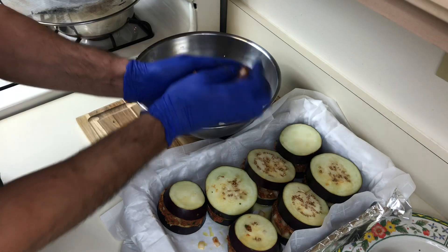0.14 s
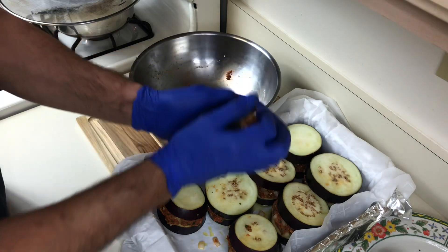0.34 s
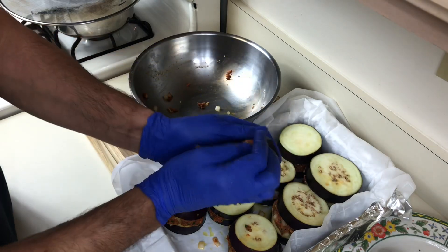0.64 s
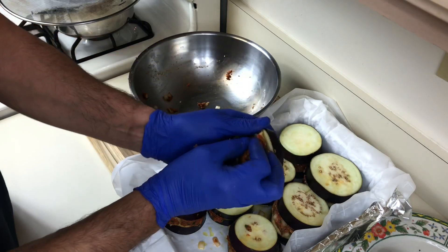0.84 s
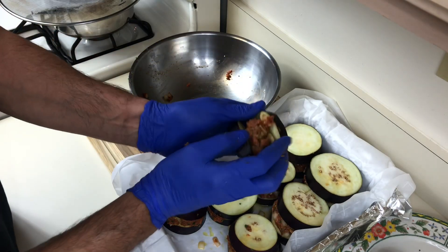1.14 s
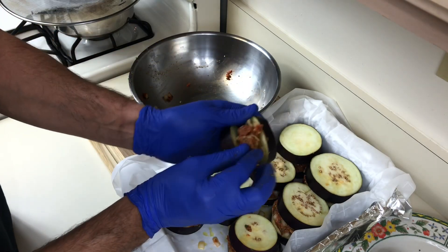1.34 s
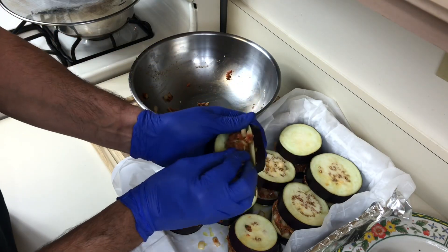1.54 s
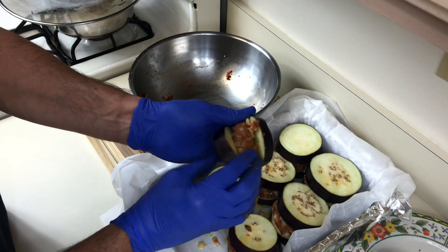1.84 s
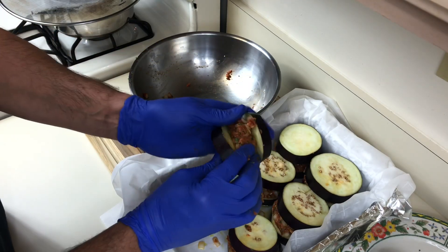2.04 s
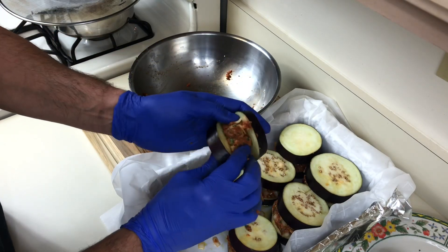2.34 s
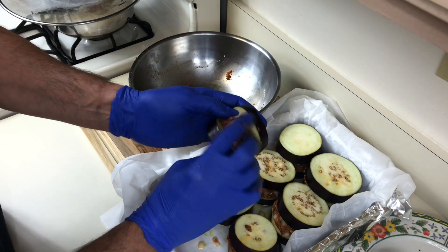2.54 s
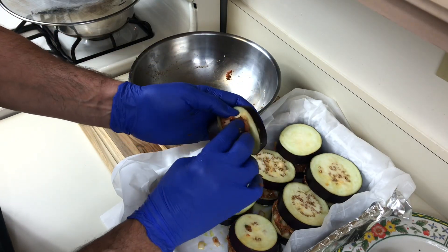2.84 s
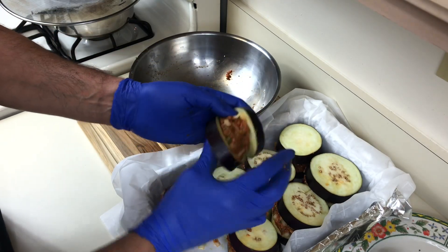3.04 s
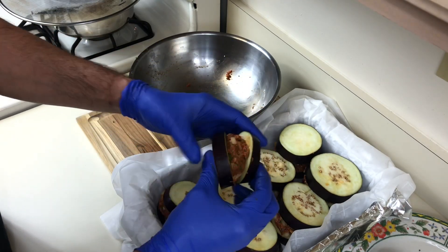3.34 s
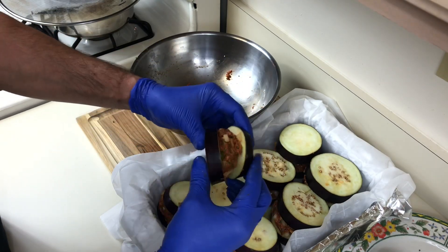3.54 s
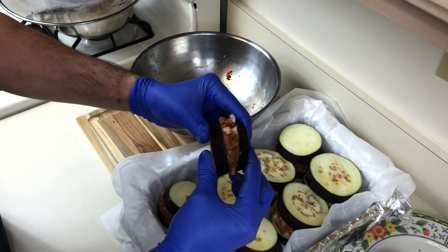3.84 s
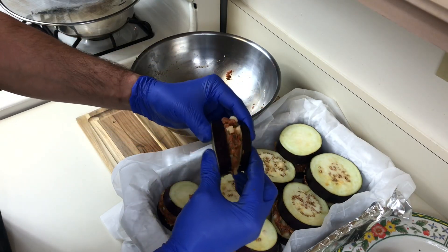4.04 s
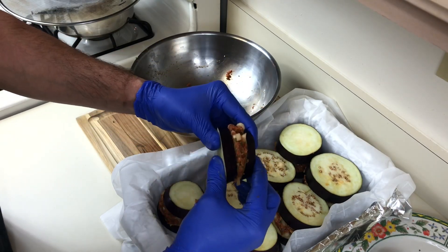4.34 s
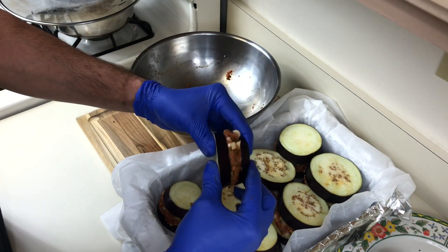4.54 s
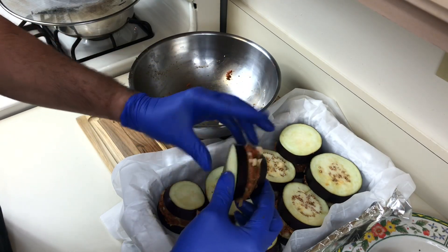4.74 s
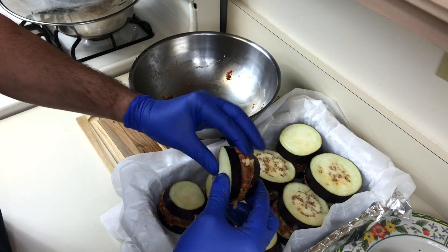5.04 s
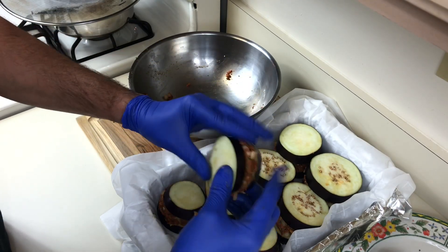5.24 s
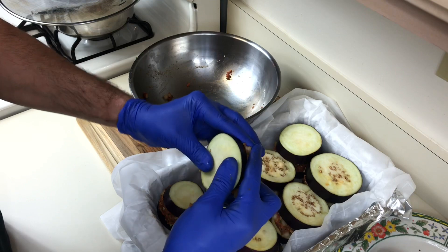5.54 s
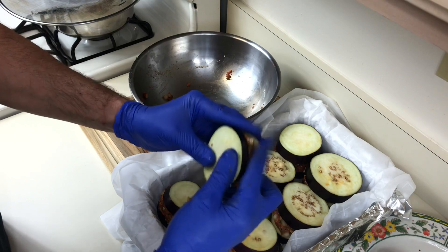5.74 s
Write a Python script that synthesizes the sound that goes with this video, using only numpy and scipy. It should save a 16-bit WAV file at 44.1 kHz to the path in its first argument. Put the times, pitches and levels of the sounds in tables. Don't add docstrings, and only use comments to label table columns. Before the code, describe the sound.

Close-miked rubber gloves handle stuffed eggplant in a small hard-walled kitchen. Fine rubbing, rustles and tiny wet ticks run over soft hiss and a wavering low hum. A soft smack comes early, a loud one at 1.5 seconds, then quieter pressing before two sharp slaps near five seconds.

```python
import sys
import numpy as np
from scipy import signal
from scipy.fft import rfft, irfft, next_fast_len
from scipy.io import wavfile

SR = 44100
rng = np.random.default_rng(int(sys.argv[2]) if len(sys.argv) > 2 else 0)


def decibels_to_gain(level_db):
    exponent = np.asarray(level_db, float) / 20
    return 10 ** exponent


def unload_audio(sound):
    columns = np.transpose(np.atleast_2d(sound))
    steps = np.round(np.clip(columns, -1, 1) * 32767)
    wavfile.write(sys.argv[1], SR, steps.astype(np.int16))


N = 260073


def rms_one(x):
    return x / np.sqrt(np.mean(x ** 2) + 1e-20)


def level_curve(rows, silent_db=-120):
    s, db = np.transpose(rows)
    return np.interp(np.arange(N) / SR, s, db, silent_db, silent_db)


def at_hz(points, hz):
    point_hz, value = np.transpose(points)
    return np.interp(np.log(hz + 1), np.log(point_hz), value)


def colour(x, points):
    size = next_fast_len(len(x) + 8192)
    gain = decibels_to_gain(at_hz(points, np.fft.rfftfreq(size, 1 / SR)))
    cepstrum = irfft(np.log(gain), size)
    cepstrum[1:size // 2] *= 2
    cepstrum[size // 2 + 1:] = 0
    return irfft(rfft(x, size) * np.exp(rfft(cepstrum)), size)[:len(x)]


def resonate(x, hz, width_hz):
    r = np.exp(-np.pi * width_hz / SR)
    poles = [1, -2 * r * np.cos(2 * np.pi * hz / SR), r * r]
    return signal.lfilter([(1 - r * r) / 2, 0, (r * r - 1) / 2], poles, x)


def drift(rate):
    steps = rng.standard_normal(4000)
    return np.interp(np.arange(N) / SR * rate, np.arange(len(steps)), steps) * np.sqrt(1.5)


def patchy(x, patchy_db, rate):
    bins, hz, out = rfft(x), np.fft.rfftfreq(len(x), 1 / SR), 0
    band = np.clip(2 * np.log2(hz / 150 + 1e-9), -1, 13)
    for k in range(-1, 14):
        share = np.maximum(1 - np.abs(band - k), 0)
        out = out + decibels_to_gain(patchy_db * drift(rate)) * irfft(bins * share, len(x))[-N:]
    return out


def grains(size, per_s, spread_db):
    strength = decibels_to_gain(spread_db * np.minimum(rng.exponential(1, size), 4))
    sign = rng.choice([-1, 1], size)
    return strength * sign * (rng.random(size) < per_s / SR)


def add(out, s, x):
    i = int(s * SR)
    out[max(i, 0):i + len(x)] += x[max(-i, 0):N - i]


# f/Hz, t60/s
KITCHEN_T60 = [(200, 0.47), (530, 0.36), (1400, 0.3), (3700, 0.23), (9700, 0.24), (15000, 0.085)]
# last until t/s, level over the diffuse sound/dB
EARLY_ECHOES = (0.011, 4.7)


def kitchen(x, onset_s=0.0016):
    t, echoes = np.arange(SR // 2) / SR, 0
    for hz in 180 * 2. ** np.arange(7):
        edges = [hz / np.sqrt(2), min(hz * np.sqrt(2), 18000)]
        sos = signal.butter(2, edges, "band", fs=SR, output="sos")
        noise = signal.sosfilt(sos, rng.standard_normal(len(t)))
        echoes = echoes + noise * decibels_to_gain(-60 * t / at_hz(KITCHEN_T60, hz))
    until_s, early_db = EARLY_ECHOES
    early = decibels_to_gain(early_db * np.clip((until_s - t) / 0.0027 + 1, 0, 1))
    echoes = echoes * np.clip(t / onset_s - 1, 0, 1) * early
    return signal.fftconvolve(x, echoes / np.sqrt(np.sum(echoes ** 2)))[:N]


# f/Hz, level per Hz/dB
HISS = [(15, -56.5), (25, -8.5), (55, 0.5), (102, 1), (127, -6), (161, -9.5), (229, -6), (416, -16.5),
        (1440, -18), (2300, -23), (3820, -29), (7710, -32), (8590, -31), (10400, -34), (11900, -30),
        (16000, -37)]


def room_hiss():
    white = rng.standard_normal(next_fast_len(N + SR))
    return decibels_to_gain(-60.5) * rms_one(patchy(colour(white, HISS), patchy_db=1.1, rate=16.))


HUM_HZ = [58, 118.4]
# t/s, level/dB
MOTOR = [(0.0, -71), (0.13, -84), (0.29, -62), (0.43, -85), (0.47, -63.5), (0.85, -76.5), (0.93, -68),
         (1.07, -81), (1.12, -73.5), (1.76, -65.5), (1.82, -77), (2.94, -63), (2.97, -71), (3.5, -59),
         (3.61, -79), (3.74, -64.5), (5.37, -71), (5.9, -66.5)]
# f/Hz, width/Hz, rms level/dB
CABINET = (220, 28, -73)


def appliance():
    waver_per_s = 8.3
    lower_db = -61 - 8 * np.abs(drift(waver_per_s))
    upper_db = level_curve(MOTOR) + 3.9 - 5 * np.abs(drift(waver_per_s))
    tones = 0
    for hz, db in zip(HUM_HZ, (lower_db, upper_db)):
        turns = np.cumsum(hz + 0.783 * drift(5.3)) / SR
        tones = tones + np.sqrt(2) * decibels_to_gain(db) * np.sin(2 * np.pi * turns)
    hz, width_hz, db = CABINET
    white = rng.standard_normal(next_fast_len(N + SR))
    drone = resonate(resonate(white, hz, width_hz), hz, width_hz)[-N:]
    return tones + decibels_to_gain(db) * rms_one(drone)


# start t/s, length/s, level/dB
CREAK = [
    (3.526, 0.213, -69),
    (3.701, 0.25, -66.5),
]
# f/Hz, width/Hz, level/dB
CREAK_MODES = [(490, 76, 9), (615, 19, 6.5), (640, 31, -15), (880, 39, -2.5), (1300, 160, -3)]


def creak():
    slips = grains(N, per_s=1500., spread_db=2.5)
    modes = sum(decibels_to_gain(db) * rms_one(resonate(slips, hz, width_hz)) for hz, width_hz, db in CREAK_MODES)
    lean, edge_s = 0, .03
    for s, length_s, db in CREAK:
        end_s = s + length_s
        lean = lean + decibels_to_gain(level_curve([(s, db), (end_s, db), (end_s + edge_s, db - 20)]))
    return lean * rms_one(modes)


# t/s, peak level/dB, f/Hz, t60/s
KNOCKS = [(1.253, -58, 810, 0.032), (1.674, -43, 1166, 0.032), (2.799, -57, 666, 0.05),
          (3.081, -53, 533, 0.041), (3.247, -48.5, 1160, 0.035), (3.264, -45, 1060, 0.039),
          (5.066, -43.5, 1480, 0.14), (1.632, -50, 1200, .09), (1.674, -51, 500, .04),
          (1.694, -55, 900, .04), (4.935, -52, 698, 0.092), (3.704, -57, 580, 0.056),
          (3.788, -53, 615, 0.062), (3.849, -53, 600, 0.05)]


def knocks():
    out, t = np.zeros(N), np.arange(8192) / SR
    for s, peak_db, hz, t60 in KNOCKS:
        ring = np.sin(2 * np.pi * hz * t)
        ring += 0.52 * np.sin(.92 * np.pi * hz * t)
        ring += 0.14 * np.sin(3.9 * np.pi * hz * t)
        wet = 0.64 * rms_one(resonate(rng.standard_normal(len(t)), hz, 460.0))
        push = 1 - np.exp(-t / 0.0036)
        add(out, s, decibels_to_gain(peak_db - 3.0 - 60 * t / t60) * (ring + wet) * push)
    return out


# t/s, rubbing level/dB
RUBBING = [(0.0, -66.5), (.4, -68.5), (.62, -63), (1.02, -66.5), (1.45, -70), (1.56, -55.5), (1.68, -66.5),
           (2.76, -78.5), (2.95, -68), (3.4, -73), (3.75, -83), (4.2, -81), (4.75, -74.5), (4.91, -63),
           (5.03, -80), (5.22, -63), (5.5, -81.5), (5.8, -67)]


def rubbing():
    s, db = np.transpose(RUBBING)
    work_db = np.interp(np.arange(N) / SR, s, db)
    bright_db = work_db.mean() + 0.55 * (work_db - work_db.mean()) - 6.5 + 2.0 * drift(25.0)
    dull_db = work_db - 2.5
    fine = rms_one(grains(N, per_s=9000., spread_db=-1.5))
    stray = rms_one(grains(N, per_s=90., spread_db=4.))
    bright = colour(fine + 0.17 * stray, [(3000, -19), (6500, -2.0), (12000, -3.5), (16000, -9.0)])
    dull = colour(grains(N, per_s=7000., spread_db=5.5),
                  [(500, -11.5), (1500, -0.5), (4000, -1.0), (8000, -5.5)])
    bright = patchy(bright, patchy_db=3.5, rate=22.0)
    dull = patchy(dull, patchy_db=1.3, rate=18.)
    return decibels_to_gain(bright_db) * rms_one(bright) + decibels_to_gain(dull_db) * rms_one(dull)


# slip t/s, build-up/s, top level/dB
SQUEAKS = [
    (.62, .09, -71),
    (1.462, 0.066, -62),
    (1.874, 0.028, -60),
]


def squeaks():
    hz, rise_db, release_s = 3360, 12, 0.022
    level = 0
    for s, build_s, db in SQUEAKS:
        level = level + decibels_to_gain(level_curve([(s - build_s, db - rise_db), (s, db), (s + release_s, db - 28)]))
    slips = grains(N, per_s=4000., spread_db=2.5)
    return level * rms_one(resonate(resonate(slips, hz, 450), hz, 704.0))


def crackle_clump(out, s, rms_db, hz, octaves, half_ms):
    t = np.arange(-6000, 6000) * 1000 / SR
    half_band = np.sqrt(2) ** octaves
    skirt = 4 ** octaves
    band = [(hz / skirt, -40), (hz / half_band, 0), (hz * half_band, 0), (hz * skirt, -40)]
    crackle = rms_one(colour(grains(len(t), per_s=6800.0, spread_db=3.0), band))
    add(out, s + t[0] / 1000, decibels_to_gain(rms_db) * crackle * np.exp(-(t / half_ms) ** 2))


# middle t/s, rms level/dB, centre f/Hz, half length/ms
SQUELCHES = [
    (.16, -68.5, 1600, 25),
    (1.72, -69, 590, 53),
    (2.2, -68, 860, 36),
    (3.4, -72.5, 640, 180),
    (2.9, -72, 656, 110),
    (5.09, -53, 580, 25),
    (.495, -66, 2200, 25),
    (3.085, -65, 1200, 5.5),
    (5.85, -66.5, 1340, 41),
    (5.88, -70, 640, 140),
]


def squelches():
    out = np.zeros(N)
    for s, rms_db, hz, half_ms in SQUELCHES:
        crackle_clump(out, s, rms_db, hz, 0.64, half_ms)
    return out


# middle t/s, rms level/dB, centre f/Hz, width/octaves, half length/ms
RUSTLES = [(.59, -67, 9050, 1, 75), (.24, -79, 6500, 1.4, 40), (1.009, -63.5, 9000, 1.1, 15),
           (1.09, -65, 6000, 2.2, 44), (1.332, -66, 5500, 0.83, 16), (1.456, -59.5, 9000, 3.6, 23),
           (1.875, -58.5, 6860, 2.8, 23), (2.375, -62.5, 12000, 2.5, 23), (2.41, -68.5, 4000, 2.2, 52),
           (2.51, -69.5, 7040, .4, 12), (2.711, -65, 8000, 2, 9.9), (2.88, -61, 10000, 1.3, 26),
           (.015, -72, 6500, 0.52, 20), (4.68, -71, 8000, 2., 20), (4.98, -74, 2500, 0.91, 45),
           (2.934, -64, 7500, 1.3, 21), (3.055, -67, 6000, 1, 17), (3.17, -68.5, 5000, 2.3, 120),
           (3.27, -65.5, 5000, 2.3, 29), (3.47, -65, 9000, 5.2, 34), (3.808, -66, 10000, 1.5, 44),
           (4.0, -73, 11500, 0.83, 72), (4.41, -62.5, 10000, 3.4, 19), (4.535, -66, 7400, 0.5, 8),
           (4.616, -59, 5240, 5, 22), (4.654, -58.5, 8000, 5.1, 15), (5.215, -63, 11000, 3.1, 52),
           (5.73, -56.5, 11500, 1.6, 23)]


def rustles():
    out = np.zeros(N)
    for row in RUSTLES:
        crackle_clump(out, *row)
    return out


# t/s, peak level/dB, pocket f/Hz
TICKS = [(.821, -49, 9320), (3.264, -52, 5500), (1.0034, -45, 7200), (1.084, -43, 5090),
         (1.1077, -47, 7200), (1.2226, -48, 9230), (1.3169, -43.5, 6200), (1.3584, -51, 9290),
         (1.4187, -47, 9390), (1.4411, -53, 8640), (1.7108, -51, 4360), (2.0855, -50, 7000),
         (2.6836, -48, 5450), (2.7172, -51, 8850), (2.8424, -56, 9050), (2.8894, -52, 4190),
         (.895, -53, 5200), (2.035, -62, 5000), (2.867, -51, 9000), (2.878, -50, 8500), (2.882, -50, 8700),
         (5.042, -55, 9500), (4.405, -52, 5000), (5.594, -58, 7500), (2.9344, -56, 8630),
         (3.049, -50, 5970), (4.4967, -50, 7150), (4.5286, -47.5, 7200), (4.6084, -46, 6000),
         (4.6483, -40.5, 7800), (5.263, -52, 4270), (5.659, -56, 7060), (5.683, -53, 8600),
         (.4065, -52, 8480), (1.3504, -55, 8820), (3.171, -48, 7000), (5.45, -56, 5500),
         (5.7924, -53, 5670)]
# t/s, peak level/dB
FILMS = [(.8111, -55), (.9423, -48), (.9847, -55), (1.2664, -53), (1.3678, -49), (2.0527, -52),
         (2.172, -41.5), (2.368, -45), (2.3744, -41), (2.8629, -52), (3.6, -48), (4.4065, -48), (3.1, -50),
         (2.8765, -46), (2.8895, -51), (2.36, -54), (2.8424, -57), (.9955, -58), (2.165, -53), (.8255, -56),
         (4.4975, -57), (4.529, -55), (5.2414, -49), (5.5293, -55), (5.7109, -48), (5.7279, -41.5),
         (1.95, -58), (4.4, -55), (5.215, -55), (3.99, -50.5), (2.5214, -57), (2.5344, -59), (5.366, -58)]
# t/s, peak level/dB, f/Hz, cycles
POPS = [(.104, -56, 2790, 4.8), (.582, -52, 3080, 5.), (.611, -49, 3100, 5.), (1.4742, -39, 3440, 3.8),
        (2.892, -47, 2820, 4.4), (3.0817, -46.5, 2500, 4.2), (2.8895, -46, 4120, 6.5),
        (2.9335, -52, 6300, 9.), (2.9345, -55, 8600, 9.), (3.2594, -41, 1090, 3.), (3.2735, -44, 900, 1.8),
        (3.3215, -46.5, 940, 2.), (3.3285, -52, 950, 2.), (4.6085, -49, 7200, 7.), (5.304, -55.5, 3050, 6.),
        (5.759, -51, 4200, 6.), (.834, -56, 5300, 6.), (4.62, -55, 4400, 14.), (3.172, -49, 3300, 4.5),
        (3.159, -51, 3200, 7.2), (3.184, -42, 3200, 4.2), (3.247, -55, 2140, 6.), (3.268, -62, 2220, 8.),
        (4.079, -49, 2040, 2.5)]
# t/s, peak level/dB, f/Hz, cycles
RUPTURES = [(5.0637, -12.5, 9080, 7.2), (5.0644, -21.5, 2950, 3.5), (5.0644, -16.5, 7300, 3.8),
            (5.0688, -22, 4340, 3.), (5.073, -26, 14500, 8.), (1.4993, -17, 5900, 4.4),
            (1.5008, -12, 4500, 3.2), (1.5, -28, 2970, 2.4), (1.5045, -24, 11200, 8.),
            (1.509, -19, 5500, 2.), (4.7755, -21, 11400, 5.), (4.7755, -26, 4040, 2.4),
            (4.7795, -20, 3740, 1.8), (4.7816, -22, 3180, 2.4), (4.784, -30, 2270, 4.6)]


def ticks():
    out, t = np.zeros(N), np.arange(1024) / SR
    thin_cycles, thin_spit, pop_spit, film_hz = 2.2, .55, .3, 12100
    rows = [(*row, thin_cycles, thin_spit) for row in TICKS]
    rows += [(*row, pop_spit) for row in POPS + RUPTURES]
    rows += [(*row, film_hz, thin_cycles, thin_spit) for row in FILMS]
    for s, peak_db, hz, cycles, spit in rows:
        air = rng.standard_normal(len(t)) * np.exp(-t / .0009)
        spray = resonate(resonate(air, hz, 0.7 * hz), hz, 0.96 * hz)
        swell = 1 - np.exp(-t * hz / .7)
        pocket = np.sin(2 * np.pi * hz * t) * np.exp(-t * hz / cycles) * swell
        add(out, s + .001, decibels_to_gain(peak_db - 2.24) * (pocket + 3.2 * spit * spray))
    return out


# t/s, peak level/dB, rise/ms, fade/ms, parted after/ms
SMACKS = [
    (0.4573, -29, 2.08, 4, 12.),
    (1.4984, -15, 2.2, 8.1, 15),
    (1.6267, -40, 1, 3.5, 14.),
    (4.7734, -19.5, 2.97, 10, 11),
    (4.922, -38, 2.5, 7.1, 16),
    (5.0641, -14.5, 0.98, 4.6, 17.),
]
# f/Hz, level per Hz/dB
SMACK_COLOURS = [
    [(150, -1), (400, -0.5), (900, 2), (1900, -2), (3200, 1.5), (5000, -4), (8000, -3.5), (12000, -6),
     (16000, -8.5)],
    [(150, -15), (400, -15), (900, -9), (1900, -3.5), (3200, -4.5), (5000, -6.5), (8000, -5.5),
     (12000, -7.5), (16000, -9.5)],
    [(300, -5.5), (900, -5), (1700, -1.5), (2600, -4), (4000, -8), (8000, -12), (16000, -22)],
    [(150, -13), (400, -13.5), (900, -3.5), (1900, -3.5), (3200, -0.5), (5000, -2), (8000, -3),
     (12000, -7.5), (16000, -12)],
    [(200, 5), (500, 5.5), (1200, 6), (2500, 3.5), (5000, 0.5), (8000, -10.5), (16000, -27)],
    [(150, -12), (400, -7.5), (900, -8.5), (1900, -2.5), (3200, -1), (4600, -3), (6200, 3), (7600, 2.5),
     (9100, 7.5), (12000, -1.5), (16000, -3.5)],
]
# f/Hz, width/Hz, level/dB
SMACK_HOLLOWS = [
    [(1520, 210, 4), (1900, 120, -3), (2900, 510, -8), (5000, 550, 2)],
    [(1165, 190, 2), (2590, 170, 5), (3770, 197, 0), (4500, 140, -1), (6040, 540, 4), (7160, 340, -13),
     (11100, 350, -1.5)],
    [(1220, 100, 0), (2560, 120, 10)],
    [(850, 32, 4), (1960, 60, 9.5), (2490, 280, -7), (3730, 300, -8), (5560, 230, -16), (7540, 180, -2),
     (11300, 740, -16)],
    [(500, 73, -6), (1130, 90, 6), (2550, 120, 5)],
    [(423, 54, 7), (900, 160, -11), (1470, 170, 12), (2660, 320, 3), (5960, 290, 0), (9000, 210, -23),
     (12000, 340, -8), (13300, 1500, 1.5)],
]


def smacks():
    near, far, t = np.zeros(N), np.zeros(N), np.arange(4096) * 1000 / SR
    for smack, points, hollows in zip(SMACKS, SMACK_COLOURS, SMACK_HOLLOWS):
        s, peak_db, rise_ms, fade_ms, parted_ms = smack
        shower = grains(len(t), per_s=19000.0, spread_db=2.0) * np.minimum(t / rise_ms, 1) ** 0.61
        shower *= np.exp(-np.maximum(t - rise_ms, 0) / fade_ms)
        shower *= np.exp(-np.maximum(t - parted_ms, 0) / 1.6)
        burst = colour(shower, points)
        puff = colour(1. * (t == 0), points)
        for hz, width_hz, db in hollows:
            lift = decibels_to_gain(db / 2)
            burst = burst + lift * resonate(burst, hz, width_hz)
            puff = puff + lift * resonate(puff, hz, width_hz)
        burst *= decibels_to_gain(peak_db) / np.abs(burst).max()
        add(near, s, burst)
        add(far, s + rise_ms / 1000, rms_one(puff) * np.sqrt(np.mean(burst ** 2)))
    return near, far


def scene():
    loud, puffs = smacks()
    small = ticks() + knocks()
    to_walls = decibels_to_gain(-1.5) * puffs + decibels_to_gain(-12.0) * small
    room = kitchen(to_walls) + appliance() + room_hiss()
    hands = rubbing() + squeaks() + creak() + rustles() + squelches()
    return (loud + small + room + hands)[None]


def band_limit(x):
    return signal.sosfilt(signal.butter(12, 16820, fs=SR, output="sos"), x)


# f/Hz, width/Hz, level/dB
MICROPHONE_DIPS = [(7650, 740, -3), (10450, 1130, -5)]


def record(dry):
    x = signal.sosfilt(signal.butter(4, 37., "high", fs=SR, output="sos"), dry)
    for hz, width_hz, db in MICROPHONE_DIPS:
        x = x - (1 - decibels_to_gain(db)) * resonate(x, hz, width_hz)
    x = signal.sosfilt(signal.cheby2(18, 60, 15580 + 600, fs=SR, output="sos"), x)
    return band_limit(x)


dry = scene()
out = record(dry)
unload_audio(out)
```